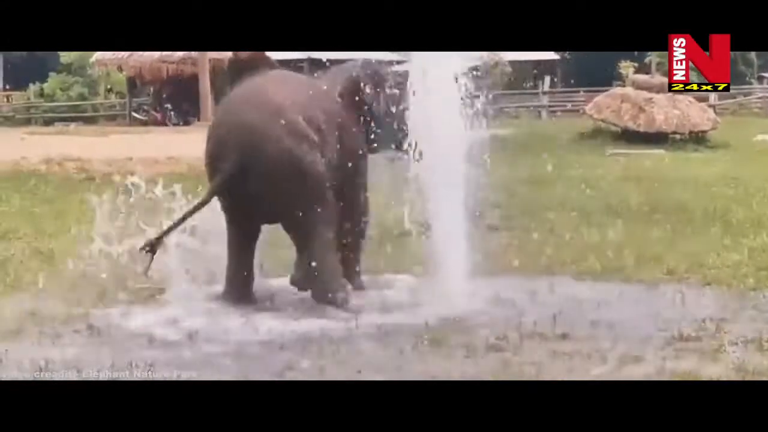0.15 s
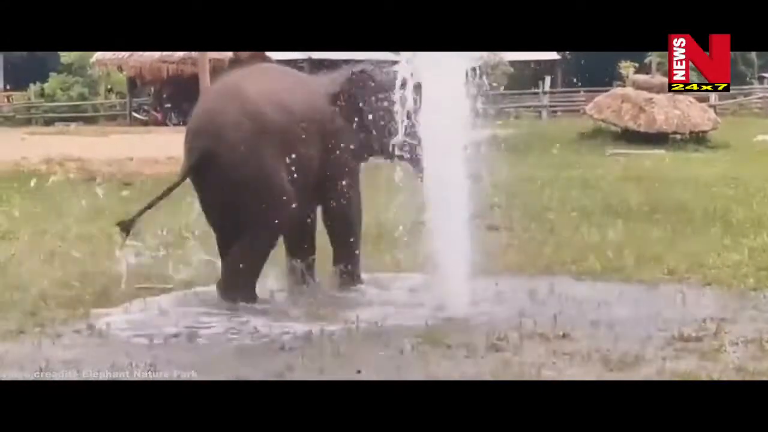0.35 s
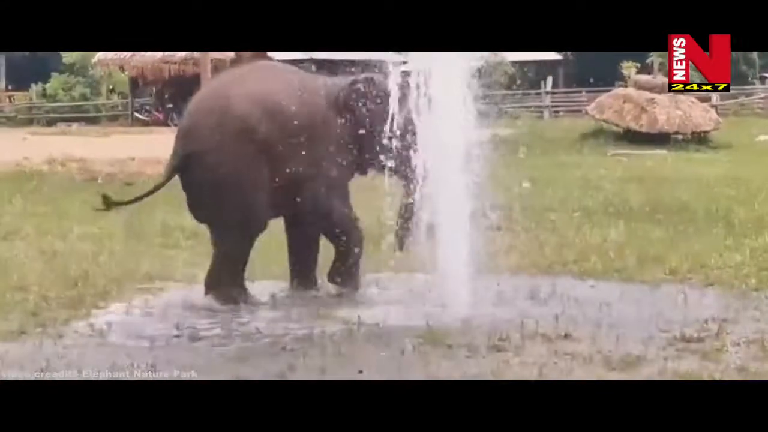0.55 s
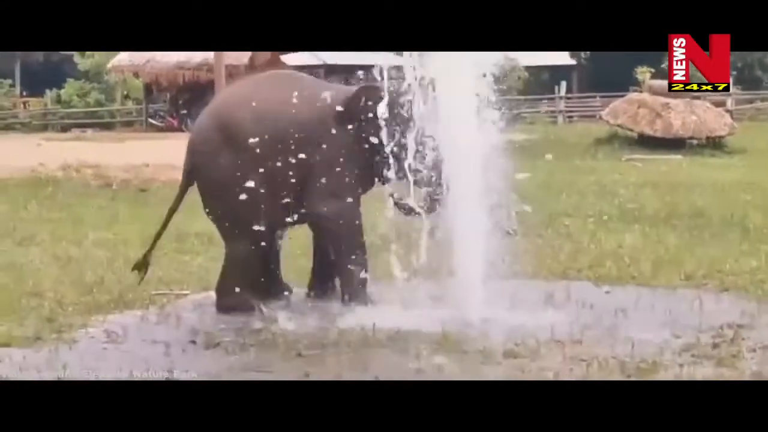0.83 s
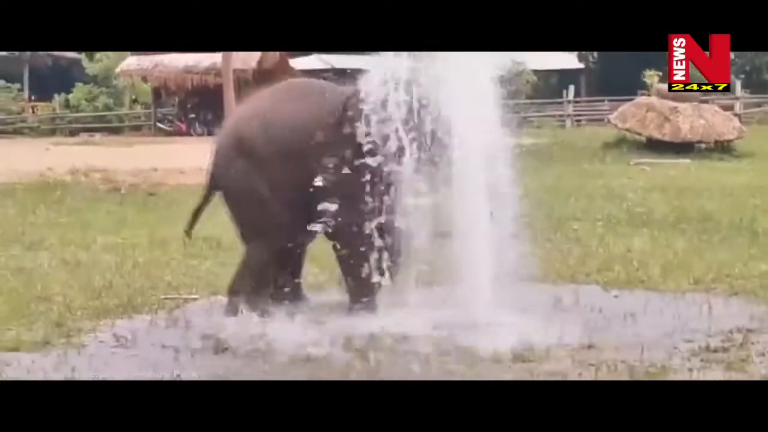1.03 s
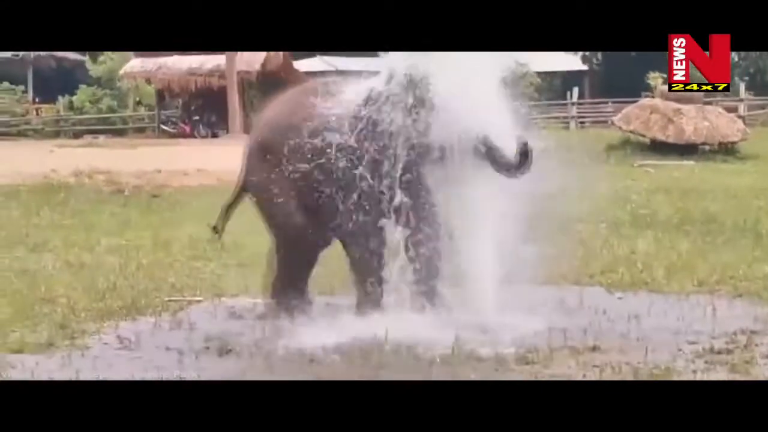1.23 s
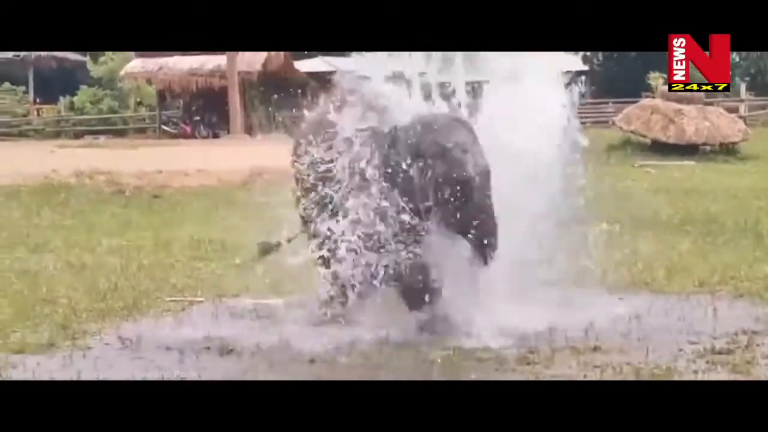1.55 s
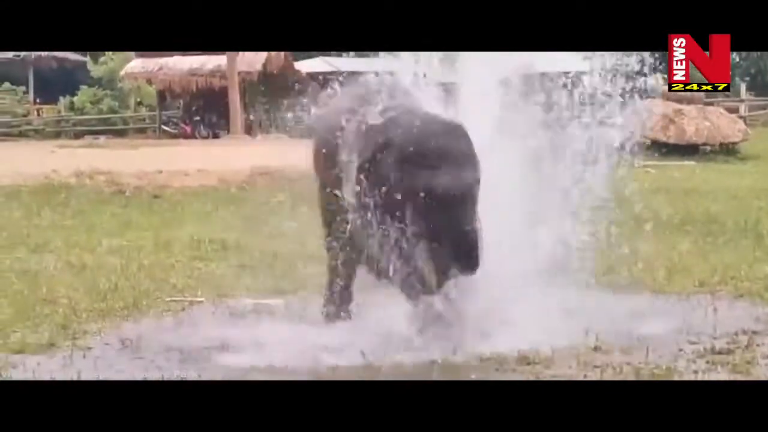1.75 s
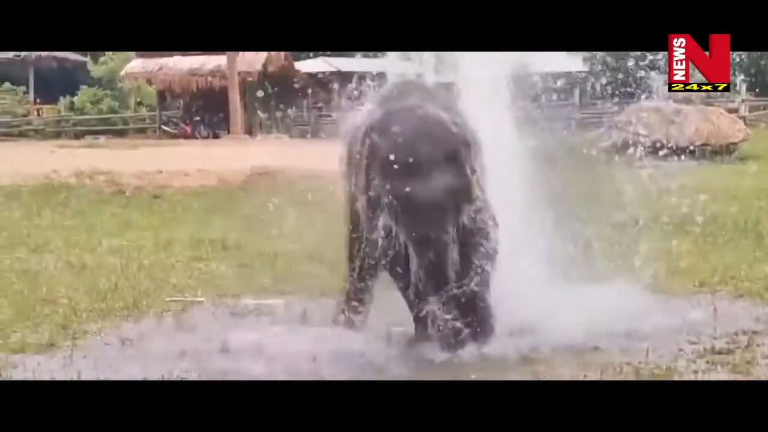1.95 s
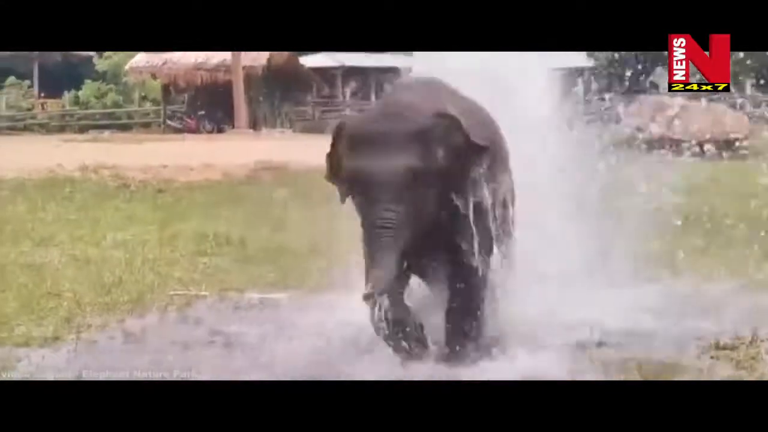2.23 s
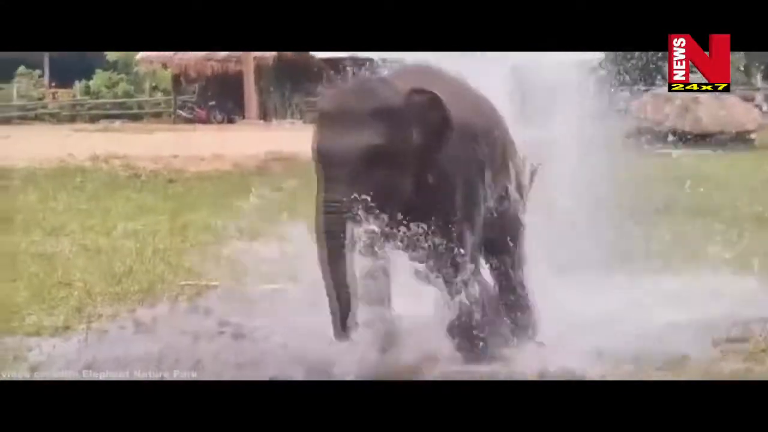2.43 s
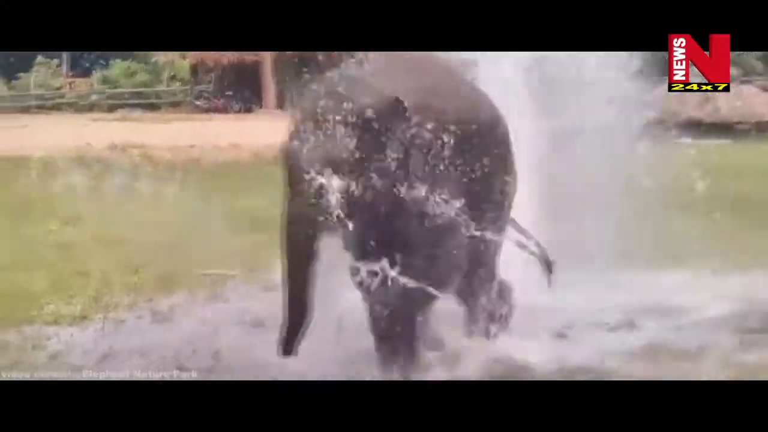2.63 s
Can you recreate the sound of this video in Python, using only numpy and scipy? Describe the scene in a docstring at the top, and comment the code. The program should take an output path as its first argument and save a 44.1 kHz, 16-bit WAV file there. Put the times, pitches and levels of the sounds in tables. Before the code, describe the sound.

Gushing water jet splattering on a puddle outdoors, growing heavier with wet slaps and low sloshing

```python
"""Hissing spray and pattering drops fall on flooded grass while a young elephant walks through the water.
Fine drops are dense random ticks and ringing bubbles over noise; big drops, streams and slosh ring lower.
Slaps and spits are short noise bursts, and sheets of water off the animal are swells of dense splatter.
Behind it, two wandering sine tones drone far away and low noise is a light wind on the microphone."""
import sys
import numpy as np
from scipy import signal
from scipy.fft import rfft, irfft, next_fast_len
from scipy.io import wavfile

SR = 44100
rng = np.random.default_rng(int(sys.argv[2]) if len(sys.argv) > 2 else 0)


def master_out(mix):
    """Clip the mix to full scale and print it as 16-bit PCM to the path in sys.argv[1]."""
    frames = np.transpose(np.atleast_2d(mix))
    ceiling = np.clip(frames, -1, 1)
    pcm = np.round(ceiling * 32767).astype(np.int16)
    wavfile.write(sys.argv[1], SR, pcm)


N = 123479  # length in samples

# Loudness of each steady layer before its trim. Each row: time in seconds, level in dB.
SPRAY_LEVEL = [(0, -33), (0.14, -36), (0.23, -35.5), (0.32, -37), (0.41, -38), (0.48, -36), (0.56, -36.5),
               (0.7, -34.5), (0.78, -38.5), (1.0, -40), (1.39, -38), (1.55, -32.5), (1.69, -34),
               (1.79, -31.5), (1.96, -34.5), (2.14, -32.5), (2.3, -34.5), (2.46, -36), (2.62, -37),
               (2.8, -34)]
PATTER_LEVEL = [(0, -42.5), (0.15, -38.5), (0.33, -40.5), (0.55, -48.5), (0.75, -45), (0.85, -51),
                (1.05, -47), (1.25, -50.5), (1.4, -43), (1.5, -40), (1.68, -40.5), (1.83, -30), (1.93, -36),
                (2.06, -36), (2.13, -39), (2.6, -39.5), (2.68, -47.5), (2.8, -42)]
POUR_LEVEL = [(0, -40), (0.36, -39.5), (0.43, -43), (0.62, -48), (1.0, -53), (1.25, -54), (1.39, -49),
              (1.46, -42), (1.54, -37), (1.61, -41.5), (1.69, -36.5), (1.78, -36), (1.92, -36.5),
              (2.0, -32.5), (2.14, -38), (2.42, -36), (2.8, -39.5)]
SLOSH_LEVEL = [(0.0, -40.5), (0.02, -47.5), (0.3, -45.5), (0.61, -56.5), (1.28, -56.5), (1.72, -49.5),
               (1.79, -36.5), (1.85, -38), (1.91, -42), (2.07, -37), (2.15, -53), (2.32, -39.5),
               (2.37, -43), (2.49, -41), (2.55, -43.5), (2.66, -45), (2.8, -41)]
WIND_LEVEL = [(0, -54), (0.2, -54.5), (0.34, -55.5), (0.5, -56), (0.8, -57.5), (1.3, -58.5), (1.7, -56),
              (1.85, -52.5), (2.2, -55), (2.45, -54.5), (2.6, -52.5), (2.8, -57)]
# Trims added to those levels, in dB
SPRAY_TRIM_DB, PATTER_TRIM_DB, POUR_TRIM_DB, SLOSH_TRIM_DB, WIND_TRIM_DB = 1.5, -0.5, 0, -2, 6

# Tone colour of each layer, before scaling to unit power. Each row: frequency in Hz, filter gain in dB.
SPRAY_COLOUR = [(750, -20), (950, -6.5), (1180, -15), (1350, -7), (1570, -4), (1790, -5.5), (1970, 1.5),
                (2170, 0.5), (2400, -2.5), (2750, -4.5), (3020, 0), (3350, -5.5), (3620, -2.5),
                (3800, -3.5), (4050, -1.5), (4700, -0.5), (5550, 0), (6050, -.5), (6300, -3.5),
                (7000, -1.5), (7800, -9), (8350, -3), (9100, -0.5), (9900, -2), (10800, -6.5),
                (12300, -6.5), (14000, -9.5)]
PATTER_COLOUR = [(900, -45), (1200, -9), (1350, -0.5), (1580, 4.5), (1680, -3), (1790, -14), (2000, -10),
                 (2200, -12.5), (2500, -4), (2800, -38), (5000, -47)]
POUR_COLOUR = [(350, -9), (500, -13), (580, -6.5), (660, 0), (840, 4.5), (1000, 0), (1170, -8), (1500, -36)]
SLOSH_COLOUR = [(70, 0), (130, -6.5), (220, 2.5), (320, 2.5), (400, -2), (480, -3), (600, -5), (1000, -6)]
WIND_COLOUR = [(10, 4), (25, -12), (48, -6.5), (70, -9.5), (110, -10), (160, -14.5), (400, -33)]
SLAP_COLOUR = [(400, -58), (650, -24), (850, 2.5), (1200, -12.5), (1550, 5), (1800, -6), (2200, 0),
               (3000, -34), (6000, -10), (14000, -26)]
SPIT_COLOUR = [(3000, -18), (6000, -3), (9500, 1), (14000, -13)]
SHEET_COLOUR = [(450, -16), (600, 6), (720, 2), (900, -2), (1100, 5), (1220, 0), (1380, 0), (1580, 6),
                (1800, -1.5), (2050, -4), (2450, 1), (2750, -20), (5000, -27)]

# Far drone. Each row: pitch in Hz, level in dB, both before the wander.
DRONE_TONES = [(90.5, -54.5), (210.5, -61)]
# Single slaps of water. Each row: start in seconds, splash strength in dB before the envelope,
# low body relative to the splash in dB, decay time constant in seconds.
SLAPS = [(0.265, -28.5, -17, 0.006), (0.319, -33.5, -1, 0.0084), (.478, -30, -22, 0.0075),
         (.708, -30, -22, .004), (0.879, -35, -22, 0.0054), (1.278, -31.5, -31, 0.0076),
         (1.454, -23, -22, 0.0042), (1.501, -30, -26, .005), (1.575, -25, -14, 0.0058),
         (1.597, -21.5, -24, 0.0058), (1.679, -31, -12, 0.0078), (1.824, -28, -1, .006),
         (1.878, -28, -22, 0.0055), (1.999, -26, -3.5, 0.0067), (2.009, -27, -28, .005),
         (2.052, -24, -16, 0.0047), (2.063, -33, -17, 0.011), (2.204, -27, -24, 0.0047),
         (2.224, -21, -15, 0.0052), (2.279, -28, -22, 0.0045), (2.473, -39, -7, .006),
         (2.499, -32.5, 3, 0.012), (2.524, -31, -20, 0.0057), (2.578, -26, -31, 0.0085),
         (2.72, -39, 13, 0.004)]
# Brief spits of fine spray. Each row: start in seconds, strength in dB before the envelope.
SPITS = [(.597, -24), (.706, -32), (.951, -23.5), (1.031, -37), (1.202, -29), (1.540, -36), (1.573, -23),
         (1.599, -32), (1.781, -24), (2.102, -26), (2.281, -25)]
# Sheets of water bursting off the animal. Each row: start in seconds, peak level in dB, length in seconds.
SHEETS = [(1.71, -36.5, 0.1), (1.782, -37, 0.13), (1.892, -34, 0.074), (1.945, -36.5, 0.064),
          (2.043, -37, .06)]

DRONE_WANDER, DRONE_SWING_DB = .022, 2.0  # spread of the wander: share of the pitch, level in dB
BURST_ATTACK_S = 0.0016  # rise time constant of slaps and spits
CUTOFF_HZ = 14000


def from_db(db):
    """Decibels to gain."""
    return 10 ** (np.asarray(db) / 20)


def rms_one(x):
    """Scale to unit power."""
    return x / np.sqrt(np.mean(x ** 2) + 1e-20)


def in_time(rows):
    """Draw a control curve through its points, at every sample."""
    return np.interp(np.arange(N) / SR, *np.transpose(rows))


def shaped(x, gain_at):
    """Filter by a gain given as a function of frequency."""
    size = next_fast_len(N + 8192)  # padded so that the filter does not wrap round
    hz = np.maximum(np.arange(size // 2 + 1) * SR / size, 1)
    return irfft(rfft(x, size) * gain_at(hz), size)[:N]


def coloured(x, colour):
    """Filter to a tone colour that falls 12 dB per octave beyond its ends; unit power."""
    table_hz, table_db = np.transpose(colour)

    def gain_at(hz):
        inside = from_db(np.interp(np.log(hz), np.log(table_hz), table_db))
        ends = np.minimum(1, np.minimum(hz / table_hz[0], table_hz[-1] / hz)) ** 2
        return inside * ends

    return rms_one(shaped(x, gain_at))


def drift(per_s):
    """Slow random wander with spread 1: noise through two equal low-pass poles at per_s Hz."""
    step = 40  # worked out at every 40th sample, then joined by straight lines
    pole = np.exp(-2 * np.pi * per_s * step / SR)
    noise = rng.standard_normal(N // step + 2002)
    slow = signal.lfilter([1], [1, -2 * pole, pole * pole], noise)[2000:]  # skip the settling
    return np.interp(np.arange(N) / step, np.arange(len(slow)), rms_one(slow))


def impacts(per_s, spread_db):
    """Random impacts of either sign: many small, a few large."""
    sizes = from_db(spread_db * np.minimum(rng.exponential(1, N), 4))
    signs = rng.choice([-1, 1], N)
    return sizes * signs * (rng.random(N) < per_s / SR)


def bubbles(per_s, spread_db, low_hz, high_hz, cycles, count=24):
    """Each impact rings a bubble at one of count pitches, down 60 dB after the given cycles."""
    hits = impacts(per_s, spread_db)
    dealt = rng.integers(0, count, N)  # which pitch each impact gets
    out = 0
    for k, hz in enumerate(np.geomspace(low_hz, min(high_hz, SR / 2 - 1), count)):
        radius = from_db(-60 * hz / (cycles * SR))
        angle = 2 * np.pi * hz / SR
        struck = hits * (dealt == k) + 1e-18
        ring = signal.lfilter([1, 0, -1], [1, -2 * radius * np.cos(angle), radius * radius], struck)
        out = out + hz * ring  # higher bubbles are weighted up
    return rms_one(out)


def water(grains, wash_db, colour):
    """Near grains over the smooth noise wash of countless farther ones."""
    wash = from_db(wash_db) * rng.standard_normal(N)
    return coloured(rms_one(grains) + wash, colour)


def shimmer(x, depth_db, per_s, count):
    """Let narrow bands swell and fade each on their own, as the mix of drop sizes shifts."""
    size = next_fast_len(N)
    spectrum = rfft(x, size)
    place = np.arange(size // 2 + 1) * SR / size / CUTOFF_HZ * count  # frequency in band widths
    out = 0
    for k in range(count + 1):
        overlap = np.maximum(1 - np.abs(place - k), 0)  # triangular, crossfading with its neighbours
        band = irfft(spectrum * overlap, size)[:N]
        out = out + band * from_db(depth_db * drift(per_s))
    return rms_one(out)


def spray():
    """Fine drops tick and fizz on the wet ground, arriving in uneven gusts."""
    ticks = rms_one(impacts(6000, spread_db=2.5))
    fizz = bubbles(1800, spread_db=2.0, low_hz=2047, high_hz=13000, cycles=16.0, count=56)
    hiss = water(ticks + fizz, wash_db=6.5, colour=SPRAY_COLOUR)
    hiss = shimmer(hiss, depth_db=3.0, per_s=9.2, count=100)
    return from_db(in_time(SPRAY_LEVEL) + SPRAY_TRIM_DB + 0.5 * drift(6.3)) * hiss


def patter():
    """Big drops smack on hide and puddle, ringing mid-pitched bubbles."""
    drops = bubbles(1100, spread_db=1.5, low_hz=1232, high_hz=2605, cycles=23.0)
    smack = water(drops, wash_db=4.5, colour=PATTER_COLOUR)
    smack = shimmer(smack, depth_db=2.0, per_s=3.1, count=100)
    return from_db(in_time(PATTER_LEVEL) + PATTER_TRIM_DB + 0.32 * drift(23)) * smack


def pour():
    """Falling streams churn the puddle into bubbles."""
    churn = bubbles(1000, spread_db=0.55, low_hz=508, high_hz=1174, cycles=18.3)
    return from_db(in_time(POUR_LEVEL) + POUR_TRIM_DB) * water(churn, wash_db=3.0, colour=POUR_COLOUR)


def slosh():
    """Heavy lumps of water plop low and dull, as large bubbles that die within a few cycles."""
    plops = bubbles(800, spread_db=1.5, low_hz=147, high_hz=564, cycles=6.8)
    return from_db(in_time(SLOSH_LEVEL) + SLOSH_TRIM_DB) * water(plops, wash_db=-7.5, colour=SLOSH_COLOUR)


def drone():
    """A far drone of two sine tones whose pitch wanders together and whose levels swing apart."""
    bent_time = np.arange(N) / SR + np.cumsum(DRONE_WANDER * drift(6)) / SR
    out = 0
    for hz, db in DRONE_TONES:
        tone = np.sqrt(2) * np.sin(2 * np.pi * hz * bent_time)  # unit power
        out = out + from_db(db + DRONE_SWING_DB * drift(6.5)) * tone
    return out


def wind():
    """A light wind rumbles on the microphone as low noise."""
    rumble = coloured(rng.standard_normal(N), WIND_COLOUR)
    return from_db(in_time(WIND_LEVEL) + WIND_TRIM_DB) * rumble


def burst(start_s, decay_s):
    """Envelope of one splash: a quick rise and an exponential fall."""
    age = np.maximum(np.arange(N) / SR - start_s, 0)
    return (1 - np.exp(-age / BURST_ATTACK_S)) * np.exp(-np.minimum(age / decay_s, 50))


def slaps():
    """Single slaps of water: short bursts of splash noise with a low body under them."""
    splash = coloured(rng.standard_normal(N), SLAP_COLOUR)
    body = coloured(rng.standard_normal(N), SLOSH_COLOUR)
    out = 0
    for start_s, db, body_db, decay_s in SLAPS:
        out = out + from_db(db) * burst(start_s, decay_s) * (splash + from_db(body_db) * body)
    return out


def spits():
    """Thin spits of spray: very short bursts of high noise."""
    fizz = coloured(rng.standard_normal(N), SPIT_COLOUR)
    return fizz * sum(from_db(db) * burst(start_s, decay_s=0.0022) for start_s, db in SPITS)


def sheets():
    """Each sheet swells and fades along half a sine as a broad, dense splatter."""
    t = np.arange(N) / SR
    swells = 0
    for start_s, db, length_s in SHEETS:
        swells = swells + from_db(db) * np.sin(np.pi * np.clip((t - start_s) / length_s, 0, 1))
    ticks = rms_one(impacts(2500, spread_db=5.0))
    ringing = bubbles(1800, spread_db=3.0, low_hz=625, high_hz=2620, cycles=7.3)
    return swells * water(ticks + ringing, wash_db=-2.0, colour=SHEET_COLOUR)


def scene():
    """Mix all the water, the drone and the wind in mono."""
    steady_water = spray() + patter() + pour() + slosh()
    background = drone() + wind()
    splashes = slaps() + spits() + sheets()
    return (steady_water + background + splashes)[None]


def record(dry):
    """Cut the top off steeply with an elliptic low-pass."""
    return signal.sosfilt(signal.ellip(12, .2, 80, CUTOFF_HZ, fs=SR, output="sos"), dry)


dry = scene()
out = record(dry)
master_out(out)
```